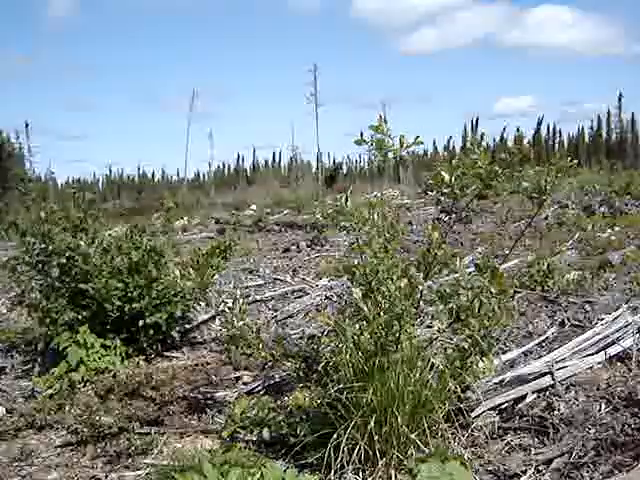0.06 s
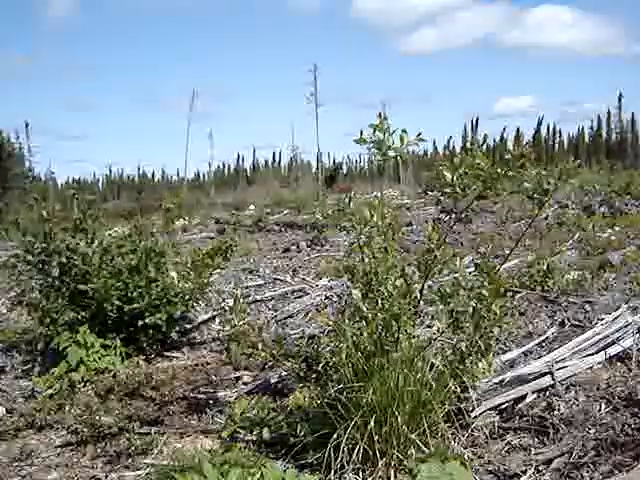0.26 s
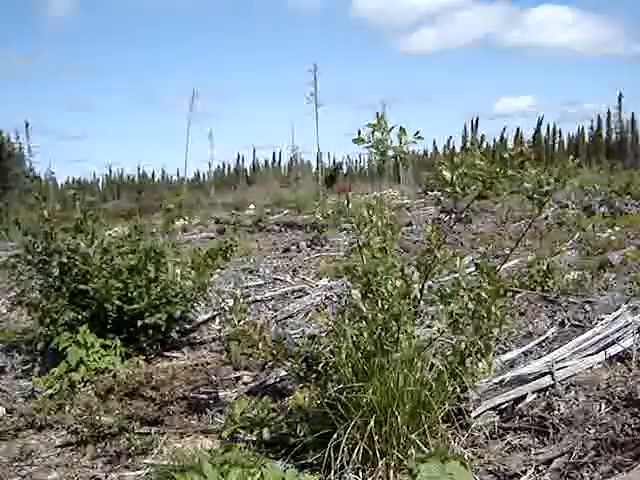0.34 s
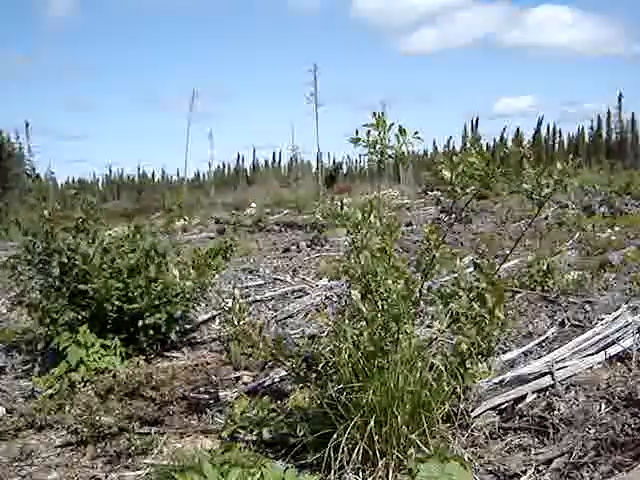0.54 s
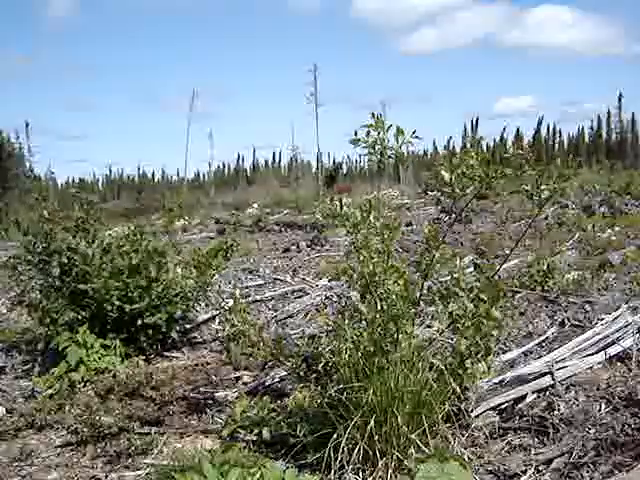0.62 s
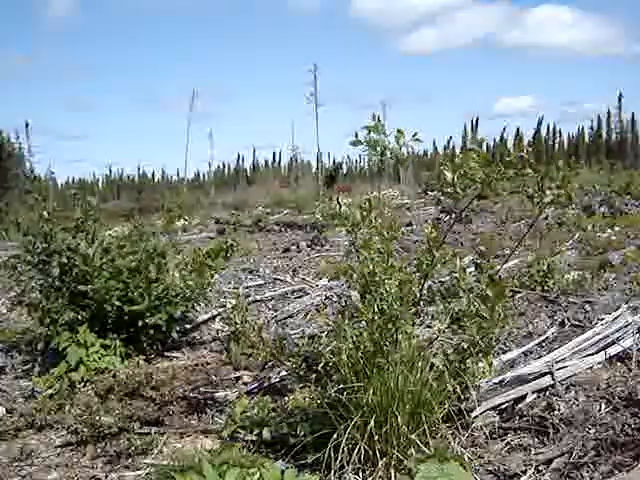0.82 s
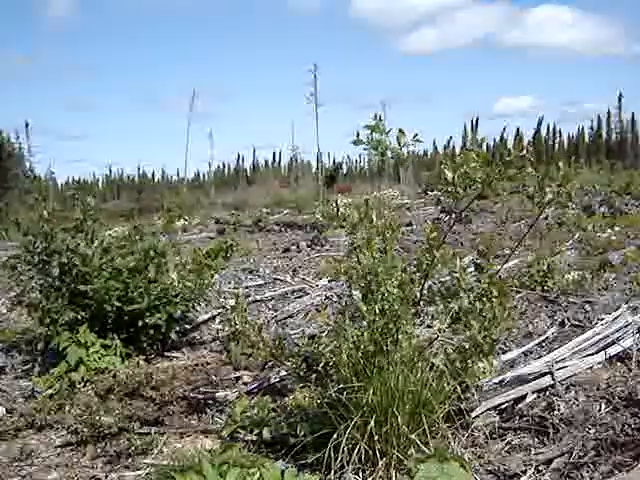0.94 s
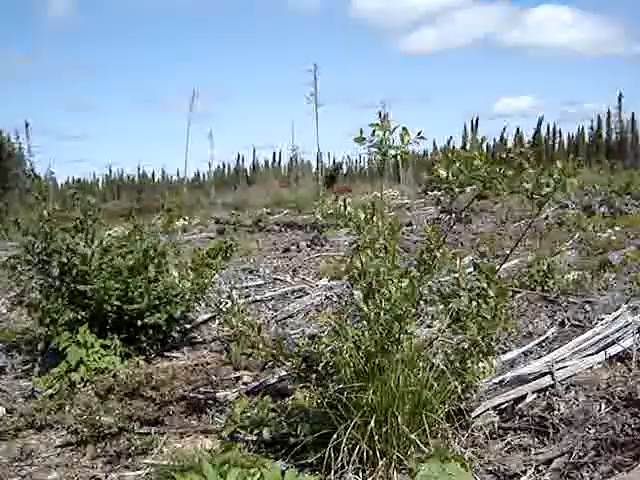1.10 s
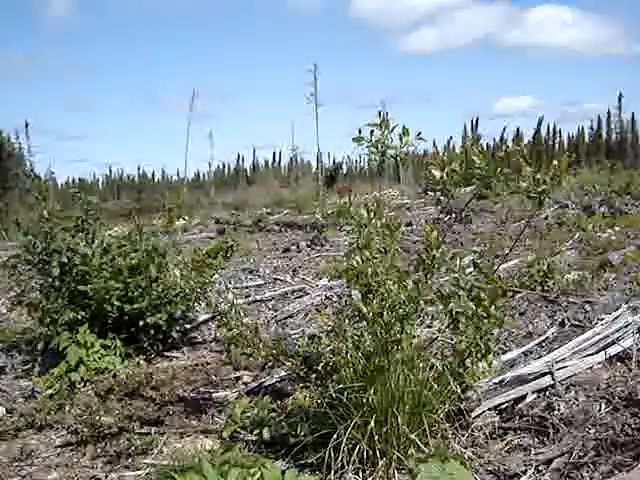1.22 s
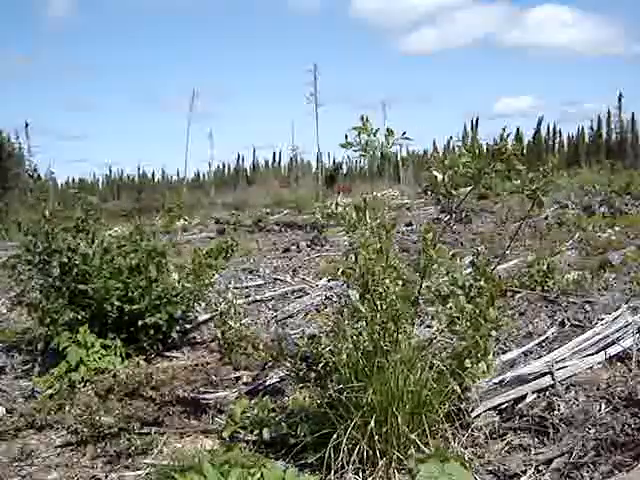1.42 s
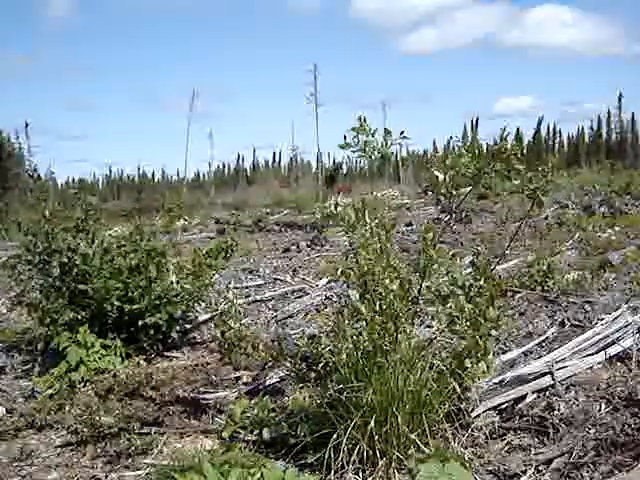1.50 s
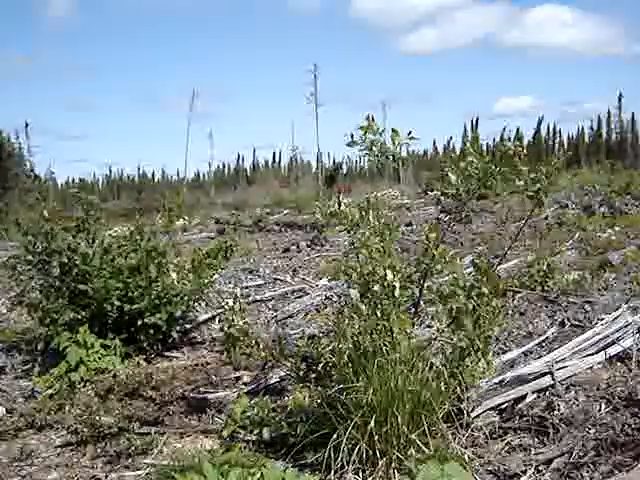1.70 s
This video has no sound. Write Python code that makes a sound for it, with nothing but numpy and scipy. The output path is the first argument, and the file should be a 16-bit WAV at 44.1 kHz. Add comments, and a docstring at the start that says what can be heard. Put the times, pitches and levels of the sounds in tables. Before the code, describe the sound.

Gusty wind rumbles and thumps on the microphone over tree hiss and faint chirps.

```python
"""A light breeze on the microphone in an open forest clearing: eddies strike it with short low thumps
over a gusting rumble, while distant trees hiss steadily. A small bird, faint at the microphone,
whistles a high trill of alternating falling and rising chirps. There is one soft knock at the start,
and the camera adds a thin whine throughout."""
import sys
import numpy as np
from scipy import signal
from scipy.fft import rfft, irfft
from scipy.io import wavfile

SR = 44100
rng = np.random.default_rng(int(sys.argv[2]) if len(sys.argv) > 2 else 0)


def wav_out(sig):
    """Save sig, one row per channel (or a flat mono array), as 16-bit PCM at SR to the path in sys.argv[1]."""
    wavfile.write(sys.argv[1], SR, np.round(np.clip(np.atleast_2d(sig).T, -1, 1) * 32767).astype(np.int16))


N = 77175


def undb(db):
    """Decibels to gain."""
    return 10 ** (np.asarray(db) / 20)


def times():
    """Time of each sample in seconds."""
    return np.arange(N) / SR


def wander(rate):
    """Smooth random drift with spread 1 that changes about rate times a second."""
    f = np.arange(N + 1) * SR / (2 * N)
    drift = irfft(rfft(rng.standard_normal(2 * N)) * np.exp(-(f / rate) ** 2))
    return drift[:N] / drift.std()


def noise(spectrum):
    """Noise of rms 1, shaped by (f/Hz, level/dB) points."""
    hz, db = np.array(spectrum).T
    f = np.maximum(np.arange(N // 2 + 1) * SR / N, 1)
    gain = undb(np.interp(np.log(f), np.log(hz), db))
    shaped = irfft(rfft(rng.standard_normal(N)) * gain, N)
    return shaped / shaped.std()


def bell(t, width):
    """A smooth swell around t = 0, its width taken at half height."""
    return np.exp2(-(2 * t / width) ** 2)


# Spectrum of the trees, heard from the clearing: f/Hz, relative level/dB
TREE_SPECTRUM = [(20, -6), (100, -17.5), (170, -2.5), (270, 0), (500, -1), (700, -2.5), (1000, -4),
                 (1250, -3), (1500, -6), (2200, -7.5), (3200, -10), (4300, -10.5), (5300, -11),
                 (6200, -12.5), (7200, -13), (8500, -15), (10000, -19.5)]

def distant_trees(level_db=-55, swell_db=0.05, flicker_db=1.13, sag_db_per_s=0.5, sag_below_hz=4100):
    """Wind hisses in far trees: the bands below the top treble flicker a little and slowly ease off."""
    remaining = noise(TREE_SPECTRUM)
    shared_db = swell_db * wander(0.87)
    sag_db = -sag_db_per_s * (times() - times().mean())
    bands = 0
    for hz in (250, 500, 1000, 2000, 4000):
        band = signal.sosfiltfilt(signal.butter(2, hz, fs=SR, output="sos"), remaining)
        remaining = remaining - band
        band_sag_db = sag_db / (1 + (hz / sag_below_hz) ** 4)
        bands = bands + band * undb(shared_db + band_sag_db + flicker_db * wander(6))
    return undb(level_db) * (bands + remaining)


# Tones of the camera, right by the microphone: f/Hz, rms level/dB
WHINE_TONES = [(7866, -81.5), (8931, -93), (8962, -85)]

def camera_whine():
    """The camera gives off thin, steady tones."""
    return sum(np.sqrt(2) * undb(db) * np.sin(2 * np.pi * hz * times()) for hz, db in WHINE_TONES)


# Spectrum of the wind on the microphone: f/Hz, relative level/dB
RUMBLE_SPECTRUM = [(12, -23), (25, -0.5), (50, 0), (90, 1), (140, -9), (220, -14), (400, -35.5), (900, -59)]
# Rumble as the gusts pass: t/s, level/dB
GUST_LEVELS = [(0, -85), (0.151, -66.5), (.22, -57), (.35, -46.5), (0.449, -50.5), (.54, -53), (.59, -59),
               (.65, -57), (.73, -63), (.84, -54), (.99, -71), (1.08, -63), (1.22, -81), (1.27, -52),
               (1.41, -60), (1.53, -66), (1.62, -78), (1.75, -65)]

def wind_rumble():
    """Air flowing over the microphone rumbles, rising and falling with the gusts."""
    gust_s, gust_db = np.array(GUST_LEVELS).T
    return noise(RUMBLE_SPECTRUM) * undb(np.interp(times(), gust_s, gust_db))


# Spectrum of the fine flutter inside a thump: f/Hz, relative level/dB
FLUTTER_SPECTRUM = [(60, -1), (150, 0.5), (300, -2.5), (500, -15), (900, -23), (2000, -62)]

def thump(at, db, width, hz, pitch_scatter=0.16, fall_over_rise=0.89, flutter_db=-20.5):
    """A brief swell of pressure swings unevenly for a cycle or two, with finer flutter inside."""
    t = times() - at
    pitch_hz = hz * np.exp(pitch_scatter * wander(hz))
    phase = 2 * np.pi * (np.cumsum(pitch_hz) / SR + rng.random())
    envelope = undb(db) * bell(np.where(t > 0, t / fall_over_rise, t), width)
    return envelope * (np.sin(phase) + undb(flutter_db) * noise(FLUTTER_SPECTRUM))


def knock():
    """One soft knock, higher in pitch than the wind's thumps."""
    return thump(at=0.02946, db=-39, width=0.0039, hz=480)


# Eddies at the microphone: t/s, peak level/dB, width/s, f/Hz
EDDIES = [(0.199, -37, 0.019, 97.6), (0.216, -29, .014, 88.2), (0.297, -31, 0.007, 103),
          (0.315, -19, 0.0045, 170), (0.326, -25, 0.013, 105), (.338, -25.5, 0.0067, 160),
          (0.353, -35.5, .009, 130.8), (0.373, -28, 0.023, 97), (0.398, -40, 0.0038, 145),
          (0.481, -46, 0.018, 66.6), (.507, -41.5, 0.0044, 124), (0.532, -51.5, 0.019, 83),
          (0.619, -33.5, 0.011, 84), (0.647, -32.5, 0.023, 116), (0.677, -38.5, 0.012, 92),
          (0.834, -31.5, 0.0046, 132.4), (0.899, -49, .01, 94), (0.954, -49, 0.021, 99.9),
          (0.983, -43.5, 0.029, 76.3), (1.025, -44, 0.0076, 149.6), (1.307, -43.5, 0.0036, 119.6),
          (1.32, -44.5, 0.011, 98.3), (1.412, -39.5, 0.014, 69.8)]

def wind_buffets():
    """Each eddy that hits the microphone makes one low thump."""
    return sum(thump(*eddy) for eddy in EDDIES)


def chirps(table, centre_hz, sweep_hz_per_s, width_s):
    """Short pure whistles, each gliding through a slightly different centre pitch."""
    whistles = 0
    for at, db in table:
        t = times() - at
        hz = centre_hz * (1 + 0.012 * rng.standard_normal())
        phase = 2 * np.pi * (hz * t + 0.5 * sweep_hz_per_s * t ** 2)
        whistles = whistles + undb(db) * bell(t, width_s) * np.sin(phase)
    return whistles


# The bird's downward and upward chirps: t/s, relative peak level/dB
DOWN_CHIRPS = [(.844, -55), (1.019, -59.5), (1.071, -61), (1.187, -58), (1.247, -51), (1.303, -53),
               (1.363, -56), (1.420, -57), (1.477, -58), (1.534, -50.5), (1.594, -51.5), (1.652, -52),
               (1.708, -52.5)]
UP_CHIRPS = [(.983, -58), (1.207, -54), (1.266, -49.5), (1.323, -48.5), (1.382, -46.5), (1.439, -48),
             (1.497, -52), (1.671, -59), (1.730, -57)]

def bird_trill(gain_db=-1):
    """A small bird trills faintly, alternating falling and rising chirps."""
    falling = chirps(DOWN_CHIRPS, centre_hz=5250, sweep_hz_per_s=-92000, width_s=0.009)
    rising = chirps(UP_CHIRPS, centre_hz=6930, sweep_hz_per_s=92000, width_s=0.007)
    return undb(gain_db) * (falling + rising)


def scene():
    """The clearing as it reaches one microphone, in mono."""
    background = distant_trees() + camera_whine() + wind_rumble()
    return (background + knock() + wind_buffets() + bird_trill())[None]


def record(dry):
    """The camera cuts the treble steeply above 10050 Hz."""
    return signal.sosfilt(signal.ellip(10, 0.2, 60, 10050, fs=SR, output="sos"), dry)


dry = scene()
out = record(dry)
wav_out(out)
```